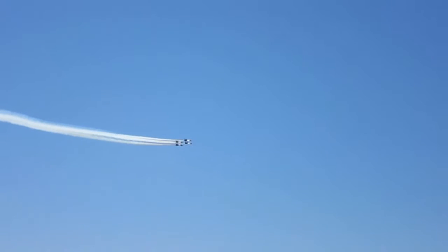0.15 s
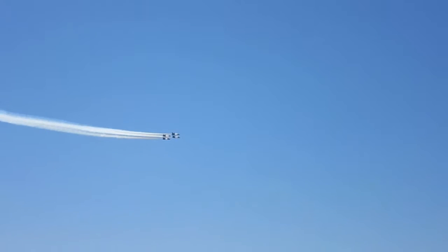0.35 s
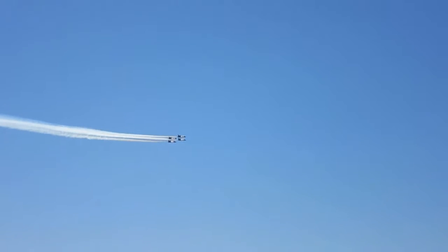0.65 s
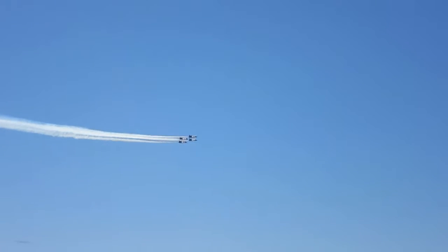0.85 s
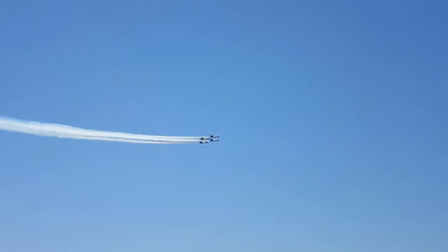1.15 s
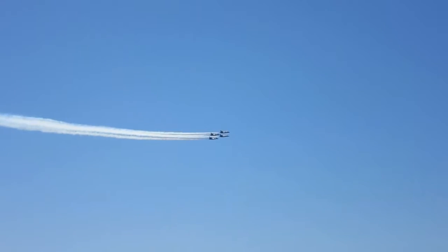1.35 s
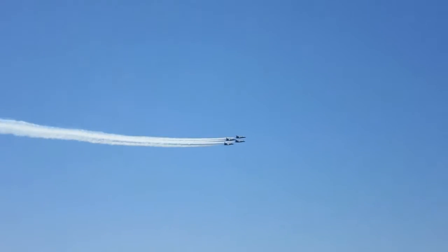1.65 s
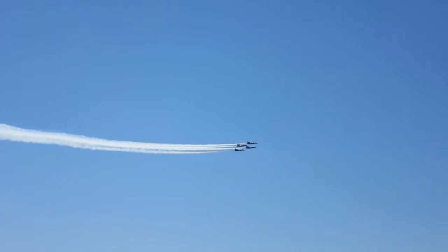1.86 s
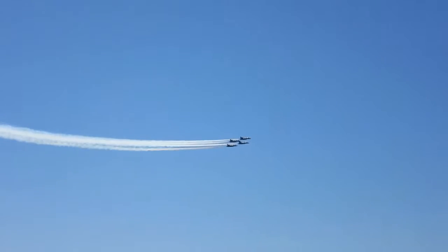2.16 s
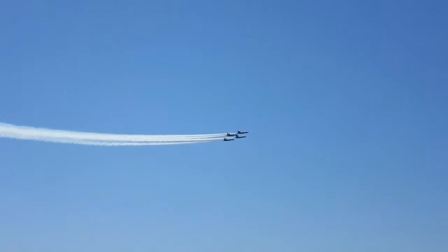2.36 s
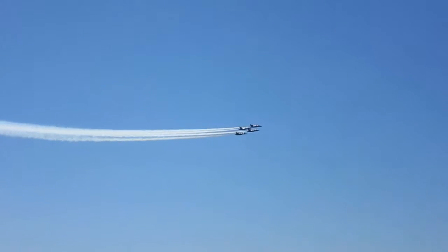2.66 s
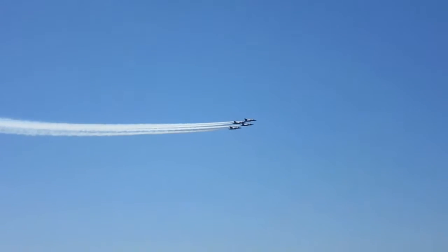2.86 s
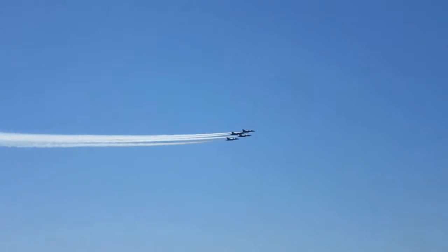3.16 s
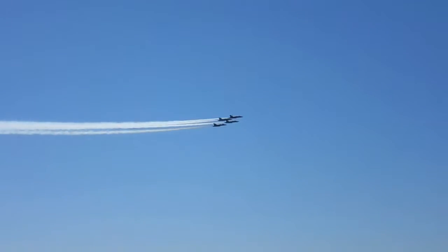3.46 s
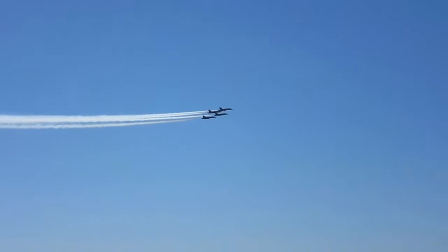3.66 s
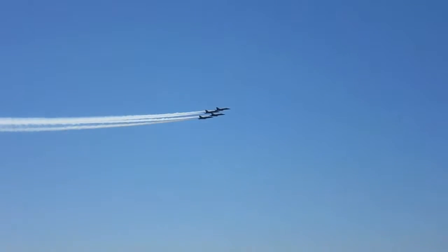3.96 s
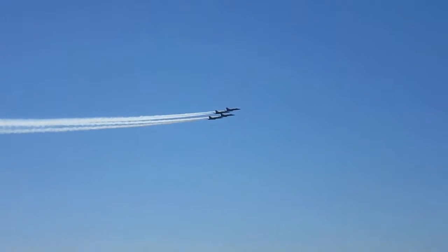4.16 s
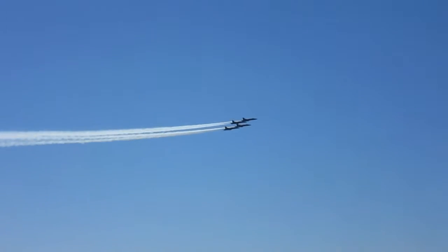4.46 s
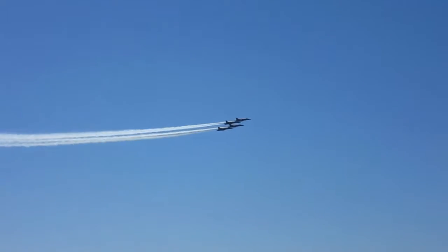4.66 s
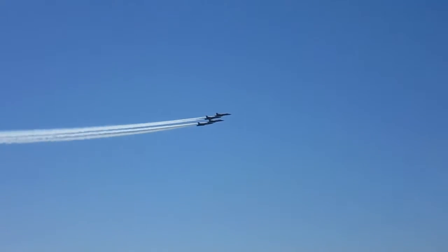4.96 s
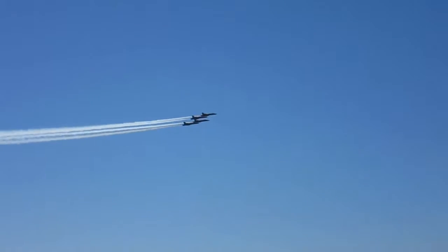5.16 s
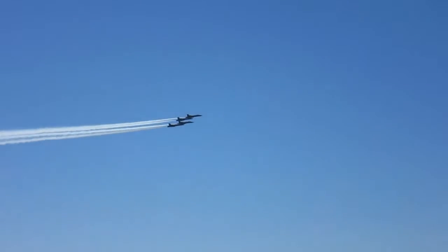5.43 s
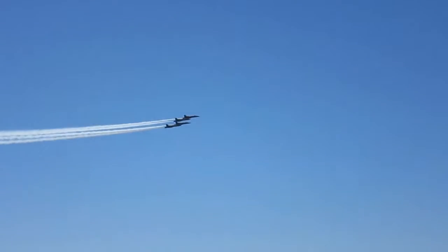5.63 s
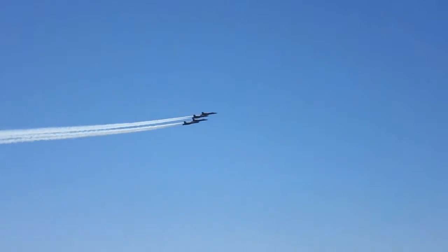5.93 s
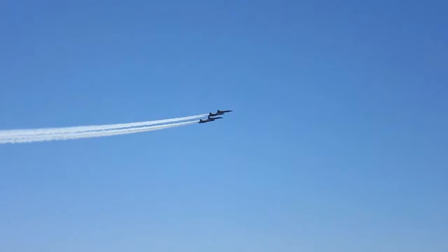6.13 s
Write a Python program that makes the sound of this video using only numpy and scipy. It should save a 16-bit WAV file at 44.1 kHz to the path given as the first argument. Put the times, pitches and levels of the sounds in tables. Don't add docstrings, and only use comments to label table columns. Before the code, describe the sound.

A handheld recorder at an open airfield picks up a distant jet formation: a low, broad, treble-poor roar growing denser and louder, its mid pitch slowly climbing. Gusts buffet the microphone throughout, strongest in the middle, with soft thuds, flapping and a cluster of hard pops around four seconds. Late on, the roar pulses roughly and nearly overloads, while automatic gain pulls down the faint background hiss.

```python
import sys
import numpy as np
from scipy import signal
from scipy.fft import next_fast_len
from scipy.io import wavfile
from scipy.ndimage import uniform_filter1d, minimum_filter1d

SR = 44100
rng = np.random.default_rng(int(sys.argv[2]) if len(sys.argv) > 2 else 0)


def voltage_ratio(decibels):
    exponent = np.asarray(decibels, float) / 20
    return 10 ** exponent


def store_pcm(level_fs):
    pcm = np.round(np.clip(level_fs, -1, 1) * 32767).astype(np.int16)
    wavfile.write(sys.argv[1], SR, np.atleast_2d(pcm).T)


N = 277389
SLOW = np.arange(0, N, 64)

# (time [s], level [dB])
ROAR_LEVEL = [(0.0, -36.5), (2.92, -25.5), (3.03, -17), (3.87, -21.5), (3.94, -26.5), (4.47, -14.5),
              (4.52, -19.5), (4.64, -20), (4.68, -24.5), (4.8, -16), (5.31, -17), (5.39, -25), (5.68, -20),
              (5.71, -12.5), (5.87, -16.5), (6.04, -11.5), (6.2, -21), (6.29, -16.5)]
# (time [s], air loss above the treble corner [dB/kHz], lower lobe centre [Hz])
APPROACH_PATH = [(0, 14.5, 280), (1, 18.5, 289), (2, 18.5, 343), (3, 32, 346), (4, 34.5, 388),
                 (4.6, 39, 392), (5.2, 28.5, 393), (5.7, 26.5, 415), (6.29, 27, 403)]
# (frequency [Hz], level per Hz [dB])
TREBLE_SPECTRUM = [(700, -9), (950, -3.5), (1150, -4), (1350, -5), (1700, -9), (2200, -9.5), (4500, -1.5)]
# (time [s], lift [dB], length [s])
LOWER_LOBE_SWELLS = [(.05, 4.5, 0.32), (1.02, 9.5, 0.19), (1.3, 8, 0.052), (1.55, 3.5, 0.13),
                     (1.96, 5, 0.15), (2.53, 5.5, .05), (2.82, 10, 0.11), (3.03, 4.5, 0.073),
                     (3.22, 8.5, 0.17), (3.68, 5, 0.13), (4.17, 1, 0.021), (4.63, 4.5, .04),
                     (4.85, 4.5, 0.053), (5.07, 5, 0.058), (5.36, -1.5, 0.095), (5.78, 7, 0.09),
                     (6.03, 7.5, 0.1)]
# (time [s], lift [dB], length [s])
UPPER_LOBE_FOCUS = [(.05, 2, .1), (.25, -2.5, .08), (.66, 0, 0.12), (1.1, 3, .12), (2.0, -2, 0.47),
                    (2.55, 0.5, 0.091), (3.13, -2.5, 0.081), (3.43, 2, .05), (3.5, -4, .04),
                    (4.05, 1.5, 0.035), (4.14, -5, 0.033), (4.22, 1, 0.04), (4.95, -1.5, 0.043),
                    (5.04, 5, .03), (5.26, 4, .02), (5.29, -6.5, 0.018), (5.32, 2.5, 0.012),
                    (5.46, 2, 0.04), (5.96, -4, .03), (6.1, -2, .05)]
# (time [s], lift [dB], length [s])
TREBLE_CLEARINGS = [
    (.55, 4, 0.32),
    (2.3, -1.5, 0.37),
    (2.9, 4, 0.091),
    (3.6, 3, 0.074),
    (4.2, -5.5, 0.25),
    (4.55, 4.5, .06),
    (4.85, 4, 0.037),
    (5.2, 2, .1),
    (5.8, 1.5, 0.14),
    (6.17, 3.5, .06),
]
# (time [s], height [dB], frequency [Hz], length [s])
ROAR_CRESTS = [(4.441, -3, 800, .004), (4.593, -5, 780, .005), (4.627, -5, 760, .004),
               (4.6403, .42, 760, .0017), (4.848, -4, 750, .004), (5.099, -3.5, 800, .003),
               (5.262, -3, 850, .003), (5.72, -3.5, 800, .006), (5.74, -4, 800, .004),
               (5.775, -3.5, 800, .004), (6.0577, .4, 800, .0018), (6.075, -5, 850, .003)]
# (frequency [Hz], level per Hz [dB])
RUMBLE_SPECTRUM = [(8.8, -39), (15, -14), (75, 2), (124, -5), (172, 3), (200, 10), (260, -35), (440, -120)]
# (frequency [Hz], level per Hz [dB])
FLUTTER_SPECTRUM = [(60, -16), (100, 0.5), (160, 1.5), (230, -3), (400, -27)]
# (time [s], lift [dB], length [s])
WIND_GUSTS = [(.33, 8.5, 0.073), (1.21, 7, 0.046), (1.34, 4.5, 0.031), (1.42, 14.5, 0.13), (1.62, 0.5, .1),
              (1.88, 4.5, 0.072), (2.27, 11.5, 0.051), (2.38, 3, 0.054), (2.5, 7, 0.042), (2.64, 13.5, .08),
              (2.83, 17, .08), (3.1, 11.5, .12), (3.36, 17, 0.14), (3.64, 19, 0.11), (4.0, 14.5, .05),
              (4.24, 14, .1), (4.36, 6.5, 0.068), (4.55, 6, 0.14), (4.8, 11.5, 0.066), (5.04, 8.5, 0.16),
              (5.45, 0, .15), (5.88, 8, .15)]
# (time [s], lift [dB], length [s])
EDGE_FLAPS = [
    (.15, 3.5, 0.081),
    (1.0, 5.5, .08),
    (1.44, 10.5, 0.045),
    (2.35, -1.5, 0.038),
    (2.98, 6, 0.12),
    (3.17, 5, 0.068),
    (3.5, 8.5, 0.14),
    (3.85, 7.5, 0.14),
    (4.13, 7.5, 0.078),
    (4.7, 5.5, 0.055),
]
# (time [s], peak [dB], frequency
# [Hz])
EDDY_HITS = [(1.201, -19, 69), (1.27, -9, 133), (1.439, -11, 124), (1.489, -13.5, 54.4),
             (2.269, -10.5, 126), (2.497, -15.5, 118), (3.647, -5, 102.5), (3.688, -16, 52),
             (4.216, -20, 86), (4.497, -11, 180), (4.619, -9.5, 187),
             (3.9985, -6, 120),
    (4.0395, -1, 330),
    (4.044, -9, 110),
    (4.076, -10, 170),
    (4.156, -9.5, 400),
    (4.164, -10, 300),
    (4.262, -18, 300),
]
# (start [s], length [s], frequency [Hz], peak [dB])
HOLLOW_TONES = [
    (1.863, .18, 177, -24),
    (4.284, .28, 168, -28.5),
    (4.862, .27, 158, -26),
    (5.136, .13, 175, -28),
    (5.992, .29, 133, -34),
]
# (start [s], length [s], frequency [Hz], peak [dB])
TURBINE_WHISTLES = [
    (.28, .06, 2420, -62),
    (2.12, .2, 2090, -63),
]
# (time [s], step [dB])
GAIN_DROPS = [
    (3.24, 1),
    (3.68, 4.5),
    (4.05, 3.5),
    (4.44, 1.5),
    (4.64, 4.5),
    (5.08, 2),
    (5.28, 4.5),
    (5.72, 2.5),
    (6.06, 3),
]
# (time [s], peak [dB])
OVERLOAD_TICKS = [(3.963, -44), (4.383, -57), (4.44, -51), (4.846, -54), (5.043, -56), (5.099, -54),
                  (5.261, -50), (5.717, -51), (5.74, -54), (5.774, -51), (5.96, -55), (6.004, -54),
                  (6.034, -53), (6.041, -50)]
# (frequency [Hz], level per Hz [dB])
HISS_SPECTRUM = [(1200, 17.5), (1800, 16.5), (2200, 6), (3000, 2.5), (4500, -1.5), (7000, -2), (10500, -5),
                 (13000, -8.5), (15000, -15.5), (18000, -17.5)]
# (frequency [Hz], level against the hiss [dB])
CIRCUIT_TONES = [
    (7298, -23),
    (10298, -24),
]


def in_time(rows, step=1):
    s, *columns = np.transpose(rows)
    return [np.interp(np.arange(0, N, step) / SR, s, c) for c in columns]


def full_rate(slow):
    return np.interp(np.arange(N), SLOW, slow)


def at_hz(points, hz):
    table_hz, table_db = np.array(points).T
    return np.interp(np.log(hz), np.log(table_hz), table_db, left=-90, right=-90)


def rms_one(x):
    return x / np.sqrt(np.mean(x ** 2) + 1e-20)


def drift(rate):
    r = np.exp(-128 * np.pi * rate / SR)
    white = rng.standard_normal(len(SLOW) + 2000)
    return rms_one(signal.lfilter([1], [1, -2 * r, r * r], white)[2000:])


def lifts(rows):
    return sum(lift_db * np.exp(-((SLOW / SR - s) / length) ** 2) for s, lift_db, length in rows)


def bank(low_hz, gain, count, size):
    edges = low_hz * 2 ** (np.arange(count + 1) / size)
    white = rng.standard_normal((3, N + 8000))
    out = np.zeros(N)
    for k, (low, high) in enumerate(zip(edges, edges[1:])):
        band_pass = signal.butter(3, [low, high], "band", fs=SR, output="sos")
        band = signal.sosfilt(band_pass, white[k % 3])[8000:]
        out += full_rate(gain(np.sqrt(low * high)) + 0 * SLOW) * band
    return out * np.sqrt(SR / 2)


def lobe(hz, centre_hz, width):
    bell = np.exp(-np.log2(hz / centre_hz) ** 2 / (4 * width ** 2))
    return bell / np.sqrt(centre_hz * width * np.log(2) * np.sqrt(2 * np.pi))


def jets(swell_db=0.4, patchy_db=1.5, flicker_db=0.5):
    t = SLOW / SR
    from_middle = t - t.mean()
    loss_db, lower_hz = in_time(APPROACH_PATH, step=64)
    upper_db = in_time(ROAR_LEVEL, step=64)[0] + lifts(UPPER_LOBE_FOCUS)
    swing_db = upper_db - upper_db.mean() - 6.5 * from_middle
    lower_db = -34.5 + 2.22 * t + gain_db() + lifts(LOWER_LOBE_SWELLS)
    treble_db = -48.5 + 4 * t + 0.21 * swing_db + lifts(TREBLE_CLEARINGS)
    upper_hz = 617 + 34.4 * t
    upper_width = 0.18 - 0.01 * from_middle
    lower_width = 0.31 + 0.02 * from_middle
    skirt_db, skirt_width = -7.5, 0.35
    corner_hz = 1245
    swell, flicker = drift(7.4), drift(52.0)

    def gain(hz):
        peak = lobe(hz, upper_hz, upper_width)
        skirt = voltage_ratio(skirt_db) * lobe(hz, upper_hz, skirt_width)
        upper = voltage_ratio(upper_db) * np.hypot(peak, skirt)
        lower = voltage_ratio(lower_db) * lobe(hz, lower_hz, lower_width)
        air_db = loss_db * max(hz - corner_hz, 0) / 1000
        treble = voltage_ratio(treble_db - 25.5 + at_hz(TREBLE_SPECTRUM, hz) - air_db)
        eddies_db = swell_db * swell + patchy_db * drift(24.0) + flicker_db * flicker
        return np.sqrt(upper ** 2 + lower ** 2 + treble ** 2) * voltage_ratio(eddies_db)

    return bank(130.25, gain, count=30, size=6)


def surged(roar):
    t = np.arange(N) / SR
    band_pass = signal.butter(2, [250, 2200], "band", fs=SR, output="sos")
    upper = signal.sosfiltfilt(band_pass, roar)
    out = roar.copy()
    for s, height_db, hz, length in ROAR_CRESTS:
        bell = np.exp(-((t - s) / length) ** 2)
        crest = voltage_ratio(height_db) * bell * np.cos(2 * np.pi * hz * (t - s))
        out -= bell * upper + crest
    return out


def wind(lumpy_db=1.5, patchy_db=1.5):
    gust_db = lifts(WIND_GUSTS)
    rumble_db = -36 + 0.75 * gain_db() + gust_db
    flutter_db = 0.06 + 2.37 * SLOW / SR - (1 - 0.45) * gust_db + lifts(EDGE_FLAPS)
    lumps = drift(41.0)

    def gain(hz):
        rumble = voltage_ratio(at_hz(RUMBLE_SPECTRUM, hz) - 16.0) / (1 + (hz / 90) ** 4)
        flutter = voltage_ratio(flutter_db + at_hz(FLUTTER_SPECTRUM, hz) - 25.0)
        return np.hypot(rumble, flutter) * voltage_ratio(rumble_db + lumpy_db * lumps + patchy_db * drift(15.0))

    return bank(13.95, gain, count=15, size=3)


def thumps():
    out, t = np.zeros(N), np.arange(int(.08 * SR)) / SR
    for s, peak_db, hz in EDDY_HITS:
        turns = t * hz
        pulse = -np.sin(2 * np.pi * turns) * turns ** 2 * np.exp(-4.5 * turns)
        at = round(s * SR)
        out[at:at + len(t)] += voltage_ratio(peak_db) * pulse / np.max(np.abs(pulse))
    return out


def hoots(waver_hz=2.8):
    out, t = np.zeros(N), np.arange(N) / SR
    waver = waver_hz * full_rate(drift(20.0))
    for s, length, hz, peak_db in HOLLOW_TONES + TURBINE_WHISTLES:
        off_middle = np.clip(t - s - length / 2, -length, length)
        fade = np.clip((length / 2 - np.abs(off_middle)) / 0.0083, 0, 1)
        level_db = peak_db - 5 * (2 * off_middle / length) ** 2
        pitch_hz = hz * (1 - 0.057 * off_middle) + waver
        tone = np.sin(2 * np.pi * np.cumsum(pitch_hz) / SR)
        out += np.sqrt(2) * voltage_ratio(level_db) * fade * tone
    return out


def gain_db(fall_s=0.038, recovery_s=1.68):
    total_db = 0
    for s, step_db in GAIN_DROPS:
        since = np.maximum(SLOW / SR - s, 0)
        total_db = total_db - step_db * (1 - np.exp(-since / fall_s)) * np.exp(-since / recovery_s)
    return total_db


def held(x, hold=0.66):
    envelope = np.abs(signal.hilbert(x, next_fast_len(N))[:N])
    gain = minimum_filter1d(np.minimum(1, hold / (envelope + 1e-9)), size=200)
    return x * uniform_filter1d(uniform_filter1d(gain, size=100), size=100)


def ticks():
    out, t = np.zeros(N), np.arange(int(.006 * SR)) / SR
    for s, peak_db in OVERLOAD_TICKS:
        puff = rng.standard_normal(len(t)) * np.exp(-((t - .002) / .001) ** 2)
        at = round(s * SR)
        out[at:at + len(t)] += voltage_ratio(peak_db + 4) * puff
    band_pass = signal.butter(2, [2300, 4000], "band", fs=SR, output="sos")
    return signal.sosfilt(band_pass, out + 1e-18)


def hiss(full_gain_db=-61):
    noise = bank(1200, lambda hz: voltage_ratio(at_hz(HISS_SPECTRUM, hz) - 39), count=12, size=3)
    t = np.arange(N) / SR
    tones = sum(voltage_ratio(db) * np.sin(2 * np.pi * hz * t) for hz, db in CIRCUIT_TONES)
    return voltage_ratio(full_gain_db + full_rate(gain_db())) * (noise + tones)


def scene():
    roar = surged(held(jets() + wind() + hoots()))
    mix = roar + thumps() + ticks() + hiss()
    return mix[None]


def roll_off(x):
    return signal.sosfilt(signal.butter(12, 15030, fs=SR, output="sos"), x)


def record(dry):
    knee, ceiling = .965, .985
    room = ceiling - knee
    over = np.maximum(np.abs(dry) - knee, 0)
    clipped = dry - np.sign(dry) * (over - room * np.tanh(over / room))
    return roll_off(clipped)


dry = scene()
out = record(dry)
store_pcm(out)
```